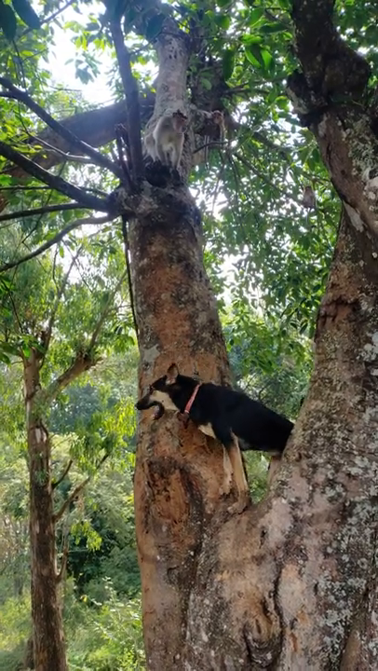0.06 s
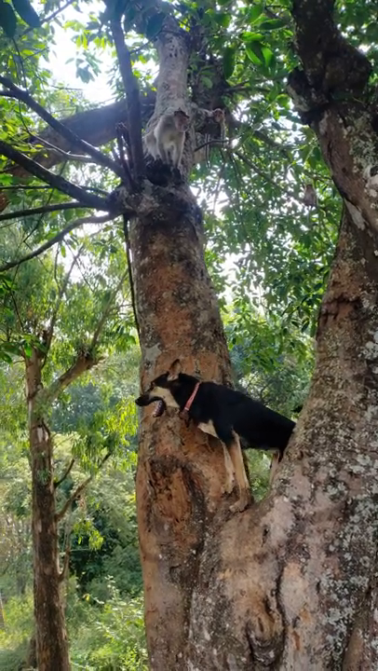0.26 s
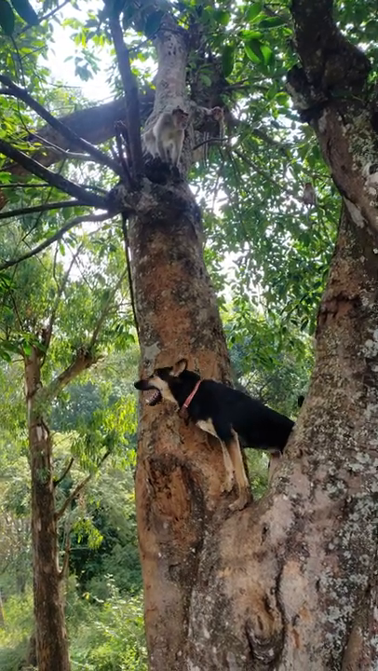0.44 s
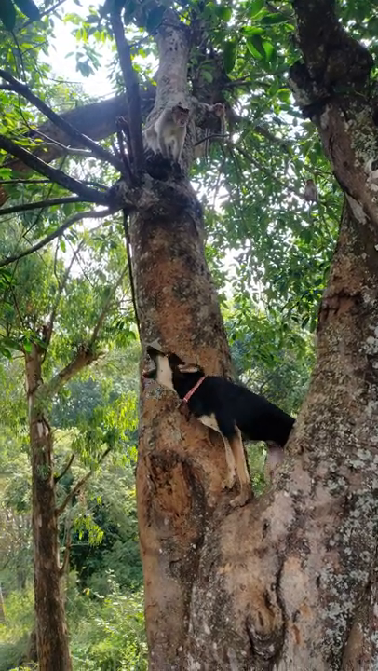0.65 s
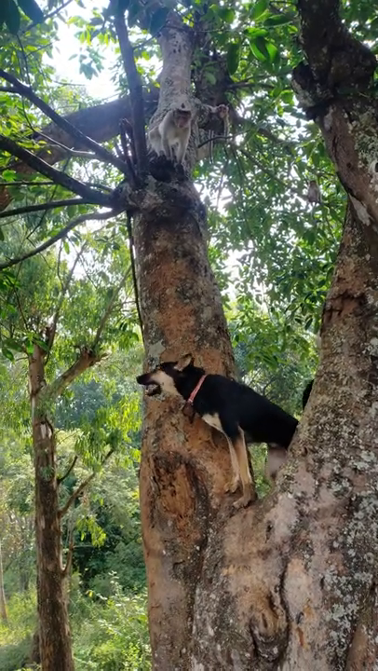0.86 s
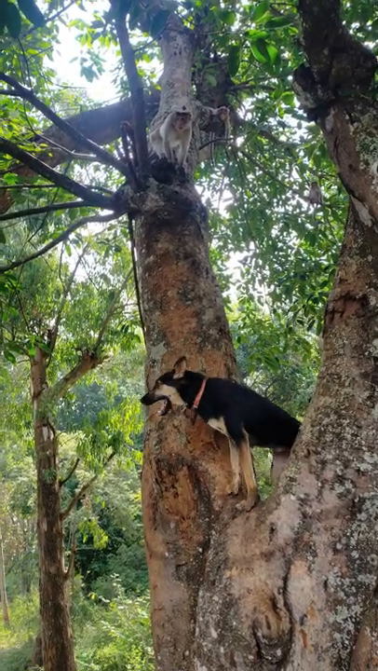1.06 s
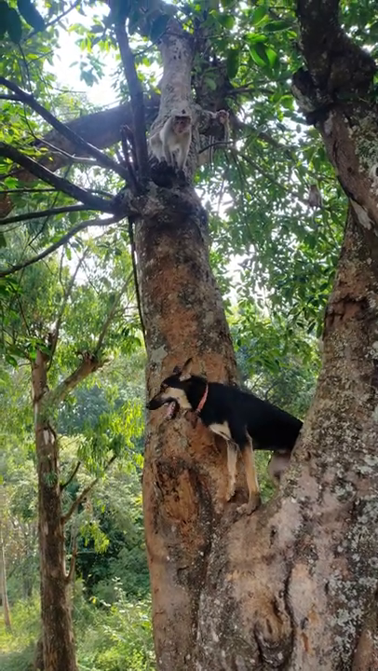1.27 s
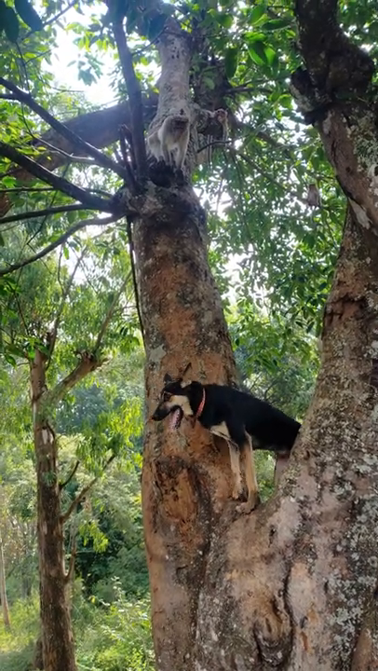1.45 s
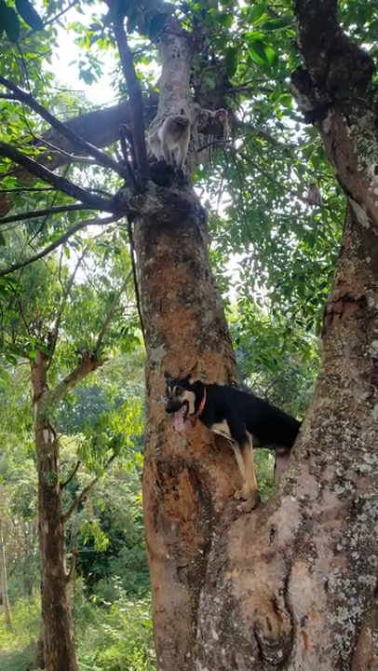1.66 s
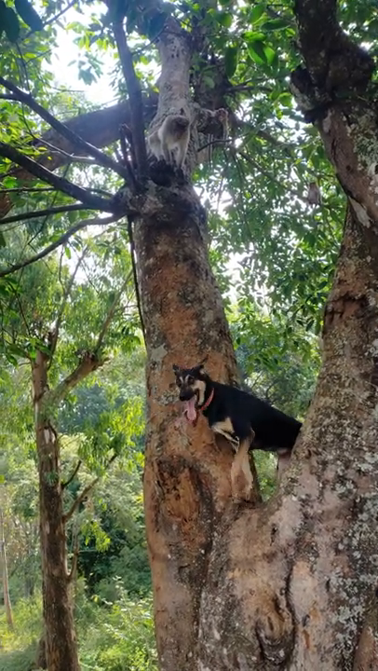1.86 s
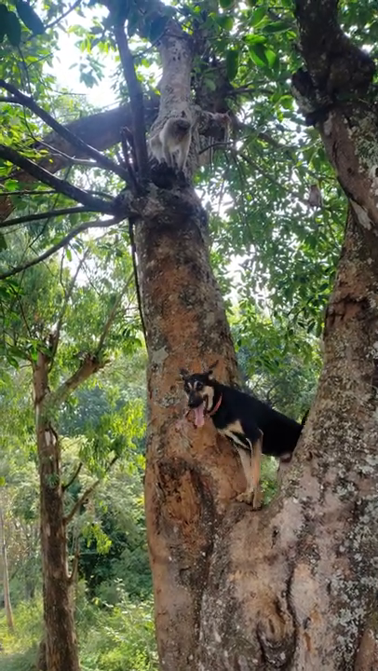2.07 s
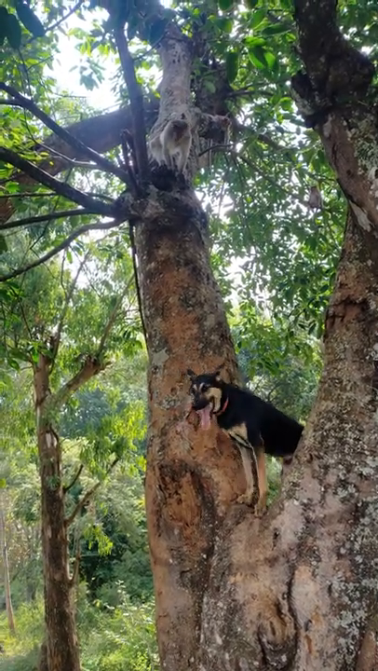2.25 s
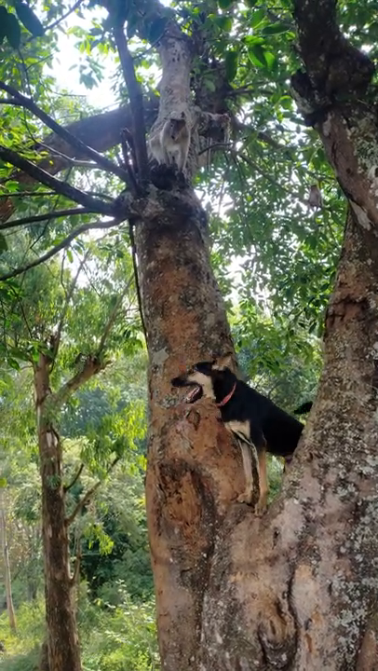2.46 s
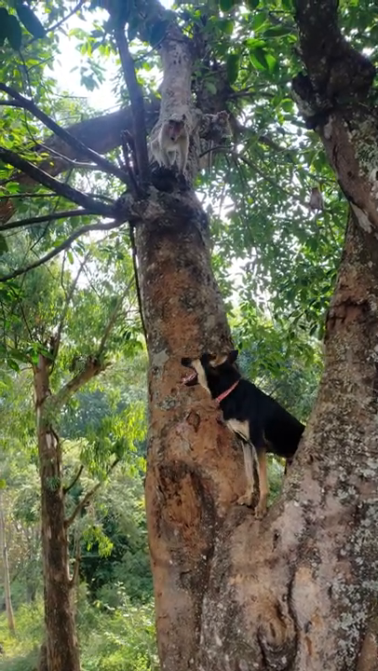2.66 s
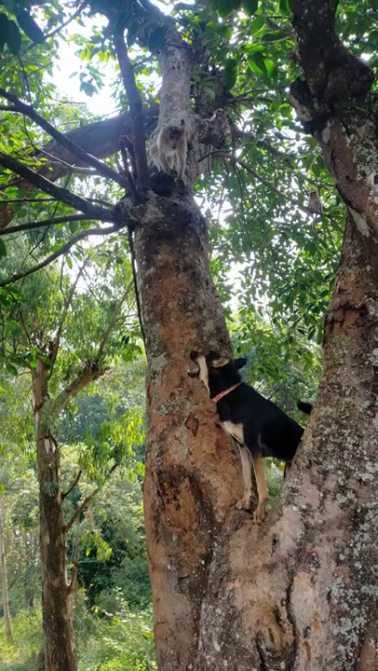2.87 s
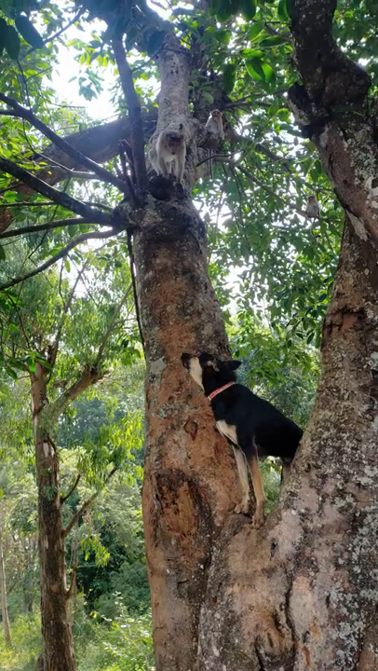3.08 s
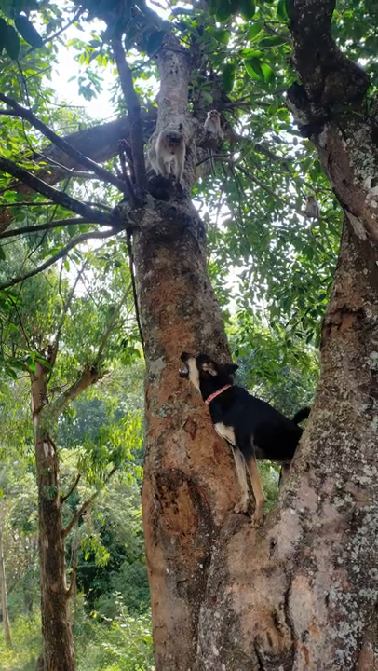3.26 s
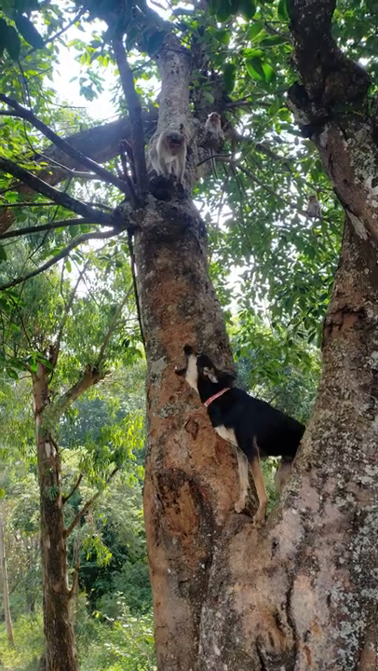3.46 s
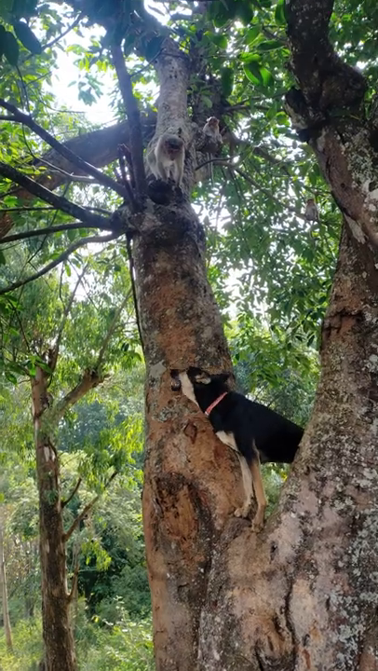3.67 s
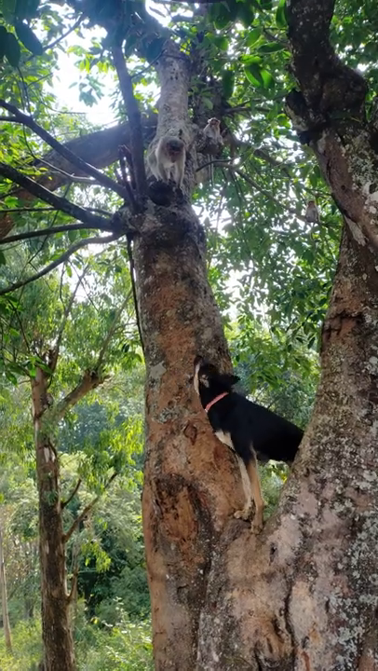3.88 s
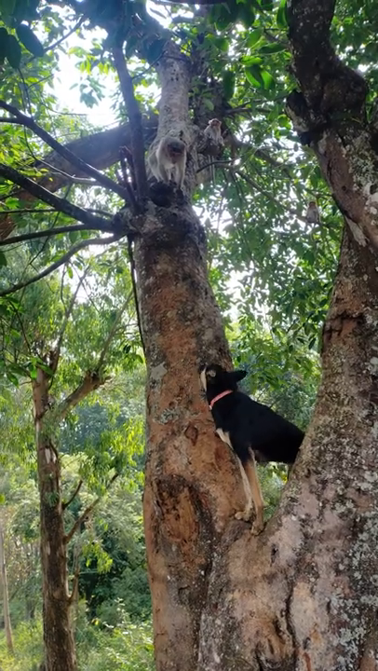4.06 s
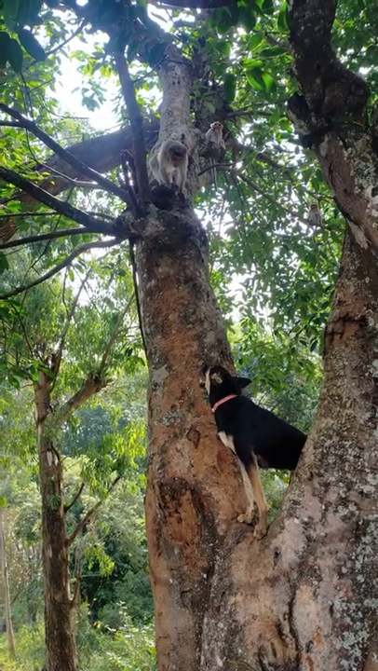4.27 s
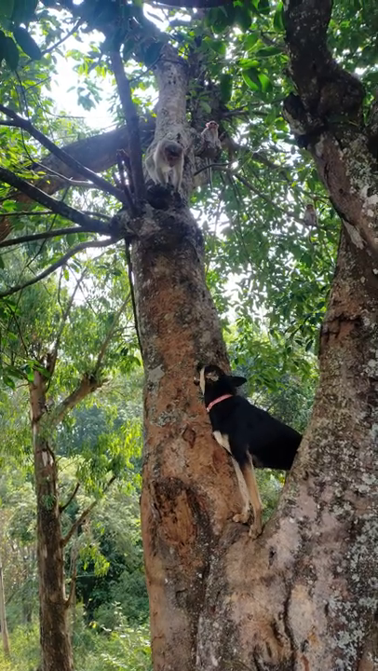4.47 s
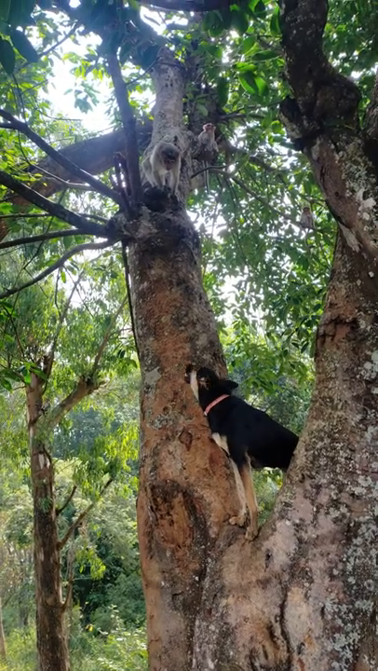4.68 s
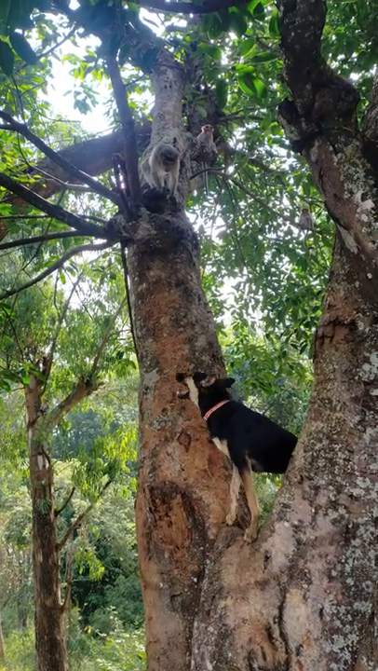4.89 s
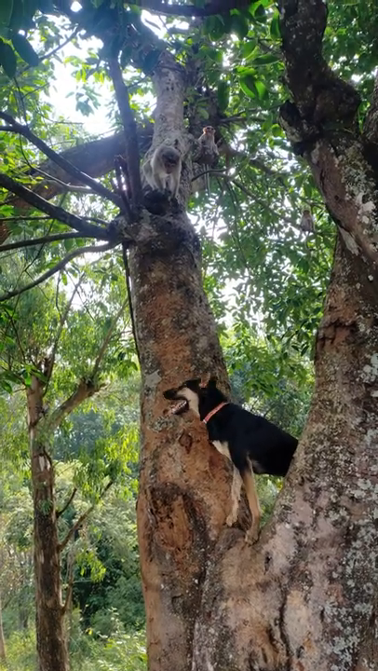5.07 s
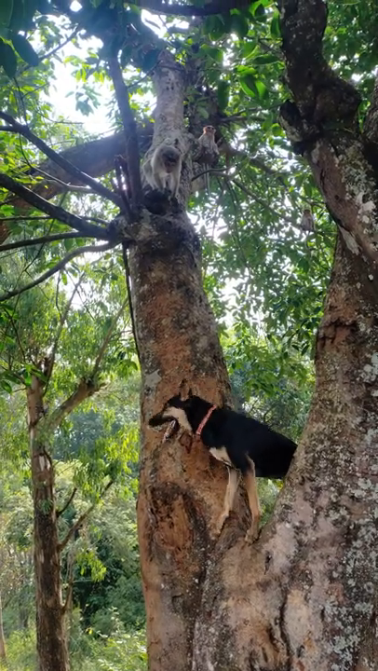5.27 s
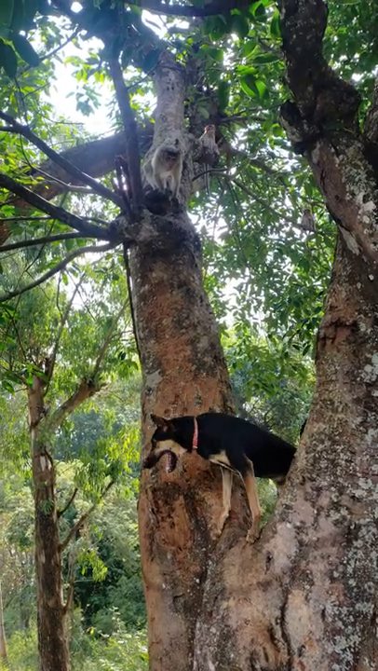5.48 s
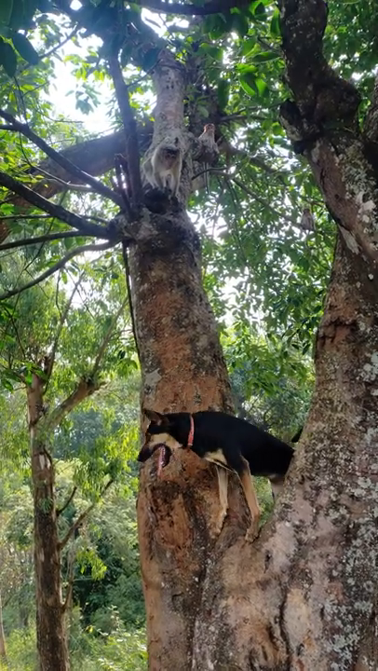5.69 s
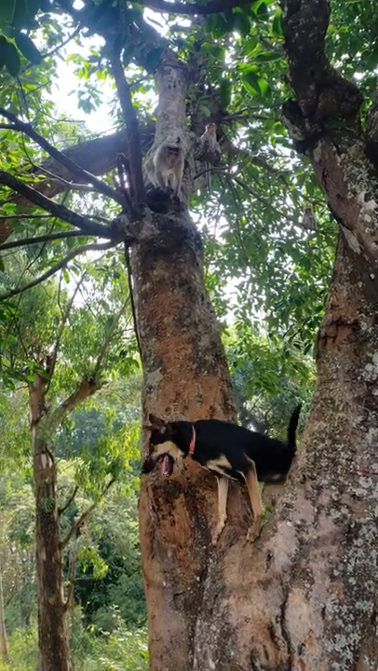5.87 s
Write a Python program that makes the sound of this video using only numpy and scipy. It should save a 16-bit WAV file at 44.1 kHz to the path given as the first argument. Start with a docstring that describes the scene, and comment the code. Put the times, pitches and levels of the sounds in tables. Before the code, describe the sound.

A dog close by in a wood gives one loud, hoarse bark. In the pause its claws tick on a tree trunk and an animal calls faintly far off. Then the dog snarls with a rattle and barks four times in a quick run, each bark starting from a low grunt and echoing off the trees. Faint insects, leaves and distant birds continue behind, while light wind rumbles on the microphone.

```python
"""Dog barking from a tree

In a wood, a dog close by in the fork of a tree barks five times, with a rattling snarl before the
second. Each bark grows out of a low grunt and a rasp, breaks upward into a clear arch and falls back
hoarse; the trees echo it. Claws tick on the trunk, insects drone among the leaves, birds and an animal
call far off, and light wind nudges the microphone, whose gain ducks under each bark."""
import sys
import numpy as np
from scipy import signal
from scipy.fft import rfft, irfft, next_fast_len
from scipy.io import wavfile
from scipy.ndimage import uniform_filter1d, minimum_filter1d

SR = 44100
rng = np.random.default_rng(int(sys.argv[2]) if len(sys.argv) > 2 else 0)


def master_out(mix):
    """Clip the mix to full scale and print it as 16-bit PCM to the path in sys.argv[1]."""
    frames = np.transpose(np.atleast_2d(mix))
    ceiling = np.clip(frames, -1, 1)
    pcm = np.round(ceiling * 32767).astype(np.int16)
    wavfile.write(sys.argv[1], SR, pcm)


N = 261513
TIME = np.arange(N) / SR


def gain_of(db):
    """Decibels to amplitude."""
    return 10 ** (np.asarray(db) / 20)


def unit_rms(x):
    """Scales to rms 1."""
    return x / np.sqrt(np.mean(x ** 2) + 1e-20)


def curve_at(points, hz):
    """Reads (frequency, value) points on a log-frequency axis."""
    f, value = np.transpose(points)
    return np.interp(np.log(hz + 1), np.log(f), value)


def add(mix, s, sound):
    """Mixes a sound in at time s."""
    part = mix[max(round(s * SR), 0):][:len(sound)]
    part += sound[:len(part)]


def noise(size=N):
    """White noise, rms 1."""
    return rng.standard_normal(N)[:size]


def shaped(x, response):
    """Filters x by a function of frequency, to rms 1."""
    size = next_fast_len(len(x) + 2048)
    return unit_rms(irfft(rfft(x, size) * response(np.fft.rfftfreq(size, 1 / SR)), size)[:len(x)])


def coloured(x, points):
    """Filters x by (f/Hz, level/dB) points, to rms 1."""
    return shaped(x, lambda f: gain_of(curve_at(points, f)))


def wander(size, rate_hz):
    """Smooth random drift, rms 1."""
    return shaped(noise(size), lambda f: 1 / (1 + (f / rate_hz) ** 4))


def step(t, width):
    """A soft step from 0 to 1 at t = 0."""
    return .5 + .5 * np.tanh(t / width / 2)


def wind(calm_db=-57.5):
    """Light gusts rumble on the microphone."""
    gusts = [(0.043, 0.16, -44.5), (0.383, .05, -52), (0.566, 0.063, -45.5), (1.27, 0.037, -45.5),
             (1.494, 0.13, -49), (4.36, 0.23, -47.5), (5.081, 0.26, -44.5), (5.82, 0.23, -45.5)]  # t/s, half length/s, level/dB
    rumble = [(8, 6), (25, 4.5), (45, 0.5), (80, -6.5), (130, -19), (250, -37.5), (600, -54.5)]  # spectrum: f/Hz, relative level/dB
    swells = sum(gain_of(db) * np.exp(-((TIME - s) / half) ** 2) for s, half, db in gusts)
    return coloured(noise(), rumble) * (gain_of(calm_db) + swells) * gain_of(2 * wander(N, 14))


def leaves(level_db=-59):
    """A faint, swaying wash of leaves."""
    rustle = [(60, -1), (250, -4.5), (450, -4), (800, -7.5), (1400, -3), (2500, -3.5), (4200, -11),
              (9500, -21), (12000, -11.5), (15500, -8)]  # spectrum: f/Hz, relative level/dB
    sway_db = 1.2 * wander(N, 5)
    return coloured(noise(), rustle) * gain_of(level_db + sway_db)


def insects(trim_db=-0.83, throb_db=0.95):
    """An insect chorus throbs in four high bands."""
    bands = [(5500, 660, -1.5), (6510, 240, -0.5), (7253, 440, 3), (7970, 560, -3)]  # drone peaks: f/Hz, width/Hz, relative level/dB
    chorus = [(0.0, -59), (2.53, -62), (2.77, -60.5), (4.99, -58.5), (5.53, -60.5), (5.93, -59.5)]  # slow rise and fall: t/s, relative level/dB
    drone = shaped(noise(), lambda f: sum(gain_of(db) / (1 + (2 * (f - hz) / width) ** 2)
                                          for hz, width, db in bands))
    return drone * gain_of(trim_db + np.interp(TIME, *np.transpose(chorus)) + throb_db * wander(N, 8.2))


def wood(x, near_t60=0.044, echo_s=0.1151, echo_width_s=0.013, far_t60=2.55):
    """Near trunks scatter at once, a stand of trees answers a moment later, the far wood lingers."""
    colour = [(200, 1.5), (500, -5.5), (800, 1.5), (1400, 3), (2400, 1), (4000, 2.5), (9000, 4),
              (15000, -0.5)]  # tone of the echo: f/Hz, gain/dB
    decay = [(200, 0.73), (700, 0.69), (1400, 0.75), (2500, 0.84), (5000, 1), (15000, 0.15)]  # ring at middle distance: f/Hz, t60/s
    size = 2 * SR
    t = TIME[:size]
    near, middle, stand, far = rng.standard_normal((4, size)) * (rng.random((4, size)) < .1)
    hz, frame_s, spectra = signal.stft(middle, SR, nperseg=256)
    spectra *= gain_of(-60 * frame_s / curve_at(decay, hz)[:, None])
    middle = signal.istft(spectra, SR, nperseg=256)[1][:size]
    # relative level/dB, reflections
    parts = [(-12, near * (t > .002) * gain_of(-60 * t / near_t60)),
             (-20, middle * np.minimum(t / 0.034, 1)),
             (-20.7, stand * np.exp(-((t - echo_s) / echo_width_s) ** 2)),
             (-33.5, far * np.minimum(t / 0.25, 1) * gain_of(-60 * t / far_t60))]
    taps = sum(gain_of(db) * unit_rms(part) for db, part in parts) / np.sqrt(size)
    taps = irfft(rfft(taps) * gain_of(curve_at(colour, np.fft.rfftfreq(size, 1 / SR))), size)
    return x + signal.fftconvolve(x, taps)[:N]


def claws(trim_db=-4.5, crumble_db=-23, crumble_t60=0.24):
    """A claw ticks on the trunk, then a little tree bark crumbles."""
    ticks = [(0.071, -41.5, 0.054), (1.3323, -27, 0.0095), (1.54, -33, 0.01), (1.5553, -31, 0.015),
             (1.5814, -26.5, 0.0082), (1.8902, -39.5, 0.041), (2.174, -48, 0.03), (5.8134, -40.5, 0.13),
             (5.85, -47, 0.04)]  # t/s, relative level/dB, t60/s
    colour = [(300, -10.5), (1200, -9.5), (2200, 1.5), (3600, -1.5), (5500, -2.5), (9500, -14.5),
              (14000, -7), (16000, -3)]  # tick spectrum: f/Hz, relative level/dB
    out, t = np.zeros(N), TIME[:6000]
    for s, db, t60 in ticks:
        fade = gain_of(-60 * t / t60) + gain_of(crumble_db - 60 * t / crumble_t60)
        add(out, s, gain_of(db + trim_db) * fade * coloured(rng.standard_normal(len(t)), colour))
    return out


def whistles():
    """Thin gliding whistles: distant birds, and the dog's whistle just before its first bark."""
    notes = [(0.074, 0.083, -68, 4000, 4100, 4130), (0.576, 0.08, -53.5, 3400, 3060, 3040),
             (2.2, 0.25, -73, 2890, 2790, 2730), (4.414, 0.18, -65.5, 2920, 3265, 3360),
             (5.48, 0.034, -67, 2950, 2720, 2440)]  # t/s, length/s, level/dB, start f/Hz, middle f/Hz, end f/Hz
    out = np.zeros(N)
    for s, length, db, *pitches in notes:
        progress = np.linspace(0, 1, round(length * SR))
        glide_hz = np.polyval(np.polyfit([0, .5, 1], pitches, 2), progress)
        phase = 2 * np.pi * np.cumsum(glide_hz * (1 + .018 * wander(len(progress), 220))) / SR
        add(out, s, gain_of(db) * unit_rms(np.sin(np.pi * progress) * np.sin(phase)))
    return out


def grunts_and_thud(half_pitch_db=-6, rattle_db=-2, slack=0.34, range_db=20):
    """Low grunts of the dog, rattling as its folds tighten, and one short, soft thud at 4.445 s."""
    events = [(.648, -37, .125, .03, 201, 800), (2.68, -51, .18, .15, 195, -51),
              (2.83, -48, .13, 0.22, 151.2, -400), (2.995, -35.5, 0.061, 0.034, 204.2, 792),
              (3.46, -37.5, 0.039, 0.04, 168, 851), (3.63, -50, .05, 0.081, 179, -1400),
              (3.93, -39, 0.11, 0.085, 202.5, 500), (4.114, -44, .055, 0.047, 214, -1600),
              (4.445, -46, .03, 0.017, 146, 197), (4.625, -37, .125, .035, 197, 645),
              (4.835, -45.5, .06, 0.051, 143, -1250)]  # loudest t/s, level/dB, swell/s, fade/s, f/Hz, glide/(Hz/s)
    rattle_colour = [(50, -19), (120, 8.5), (320, -1.5), (500, -4), (1000, -28)]  # f/Hz, level/dB
    out = np.zeros(N)
    for s, db, swell, fade, hz, glide in events:
        t = np.arange(-swell, fade, 1 / SR)
        size = len(t)
        strain = 1 if glide > 0 else slack
        level = gain_of(db - range_db * np.maximum(-t / swell, t / fade))
        level *= signal.windows.tukey(size, .15)
        phase = 2 * np.pi * np.cumsum((hz + glide * t) * (1 + .06 * strain * wander(size, 80))) / SR
        skips = strain * gain_of(half_pitch_db) * np.sin(phase / 2)
        tone = unit_rms(np.sin(phase) + skips + 0.36 * np.sin(2 * phase))
        rattle = coloured((1 + np.cos(phase / 2)) * noise(size), rattle_colour)
        add(out, s - swell, level * unit_rms(tone + strain * gain_of(rattle_db) * rattle))
    return out


def throat(x, formants, low_hz, tilt_db_per_octave=0, top_hz=2700, valley_db=-23):
    """The throat's resonances ring on after each pulse, between steep band edges."""
    size = next_fast_len(len(x) + 4096)
    f = abs(np.fft.fftfreq(size, 1 / SR)) + 1
    peaks = sum(gain_of(db) / (1 + (2 * (f - hz) / width) ** 2) ** 0.92 for hz, width, db in formants)
    edges = np.sqrt((1 + (low_hz / f) ** 14) * (1 + (f / top_hz) ** 24))
    tilt = gain_of(tilt_db_per_octave * np.log2(f / low_hz))
    log_gain = np.log((peaks + gain_of(valley_db)) * tilt / edges + 1e-4)
    minimum_phase = np.exp(np.conj(signal.hilbert(log_gain)))
    return unit_rms(np.fft.ifft(np.fft.fft(x, size) * minimum_phase).real[:len(x)])


def rasps(rattle_hz=110):
    """Short puffs rattle through the half-shut throat as it tightens for a bark."""
    puffs = [(0.534, -46, 0.091), (0.573, -32.5, 0.01), (0.595, -40.5, 0.082), (2.9, -51.5, 0.065),
             (2.942, -44, 0.1), (2.965, -34, 0.029), (3.443, -33, 0.007), (3.888, -39, 0.029),
             (4.527, -48, 0.085), (4.562, -43, 0.033), (4.591, -28, 0.018)]  # t/s, level/dB, fade/s
    formants = [(753, 166, 9.5), (1340, 240, -1.0), (2080, 720, -3.5)]  # f/Hz, width/Hz, level/dB
    out = np.zeros(N)
    for s, db, fade in puffs:
        t = TIME[:round(2 * fade * SR)]
        rattle = 0.3 + np.exp(-(t * rattle_hz % 1) / 0.077)
        puff = throat(rattle * noise(len(t)), formants, low_hz=360)
        add(out, s, gain_of(db) * puff * np.minimum(t / 0.0028, 1) * np.exp(-(t / fade) ** 4))
    return out


def chest_push(start, attack, length, release, effort_db, low_hz, break_s, top_s, top_hz,
               rough_start, rough_top, rough_end=0.86, sag_db_per_s=17.5, pitch_per_db=.0055):
    """One push of the chest: pitch follows effort, breaks upward into an arch, and falls back hoarse."""
    lead_s, trail_s = .03, 0.044  # the folds stir before a bark and run on after it
    t = np.arange(-lead_s, length + trail_s, 1 / SR)
    push_db = 20 * np.log10(step(t, attack) * step(length - t, release) + .01)
    arch_width_s = np.where(t < top_s, .054, .039)  # climbs slowly, drops faster
    arch = step(t - break_s, 0.0031) * np.exp(-((t - top_s) / arch_width_s) ** 2)
    hz = (low_hz + (top_hz - low_hz) * arch) * np.exp(pitch_per_db * push_db)
    dip_db = 2 * np.exp(-((t - break_s) / 0.044 - 1) ** 2)  # the level stumbles after the break
    rough = np.interp(t, [break_s, top_s, length], [rough_start, rough_top, rough_end])
    return start - lead_s, effort_db + push_db - sag_db_per_s * t - dip_db, hz, rough, arch


def teeth_hiss(puffs, cycles, effort_db, level_db):
    """Air buzzes past the teeth, most when the jaw is widest, and fades later than the voice."""
    colour = [(1500, -19), (3000, 4), (4300, -6.5), (5800, -4.5), (7000, -8), (9000, -17.5), (11500, -13.5),
              (14000, -8), (16000, -3.5)]  # spectrum: f/Hz, relative level/dB
    progress = np.linspace(0, 1, len(puffs))
    jaw_db = 9 * (np.sin(np.pi * progress) - 1)
    flutter_db = 2 * wander(len(puffs), 45)
    linger_db = 0.73 * (effort_db.max() - effort_db) * progress
    buzz = sum(np.cos(2 * np.pi * (k * cycles + rng.random())) for k in range(8, 19))
    air = coloured(unit_rms(puffs) + gain_of(-12) * unit_rms(buzz), colour)
    return air * gain_of(level_db + jaw_db + flutter_db + linger_db)


def bark(push, formants, voicing):
    """Vocal folds beat, now cleanly, now unevenly with puffs of air, through the throat."""
    hiss_db, low_hz, second_low_db, second_high_db, third_db, split_db, bite_db = voicing
    s, effort_db, hz, rough, arch = chest_push(*push)
    size = len(hz)
    t = TIME[:size]
    rough = np.clip(rough * (1 + 0.17 * wander(size, 35)), .01, 1)
    jitter = (0.0057 + .025 * rough) * wander(size, 200)
    waver = 0.011 * rough * wander(size, 40)
    cycles = np.cumsum(hz * (1 + jitter + waver)) / SR
    # under strain, strong and weak beats alternate: partials appear halfway between the whole ones
    split = gain_of(split_db) * np.sqrt(rough / rough.mean())
    partials = {k: np.cos(2 * np.pi * (k * cycles + rng.random())) for k in np.arange(2, 22) / 2}
    folds = sum((split if k % 1 else 1) * partial * gain_of(3 * wander(size, 35))
                for k, partial in partials.items())
    throat_air, teeth_air = (0.27 + np.exp(-(cycles % 1) / 0.64)) * [noise(size), noise(size)]
    air_share = .1 + .65 * rough
    voice = (1 - air_share) * throat(folds, formants, low_hz, tilt_db_per_octave=-2)
    voice += air_share * throat(throat_air, formants, low_hz, tilt_db_per_octave=2)
    # the second partial carries the "wow"; the third flares as it sweeps through the second resonance
    second, third = (np.cos(np.angle(signal.hilbert(throat(partials[k], formants, low_hz))))
                     for k in (2, 3))
    second *= gain_of(second_low_db + (second_high_db - second_low_db) * arch)
    second /= np.sqrt(1 + (450 / (2 * hz)) ** 14)  # it dies below the throat's range
    third *= gain_of(third_db) / np.sqrt(1 + ((3 * hz - formants[1][0]) / 130) ** 2)
    voice += 2 * (1 - rough) * (second + third)
    voice /= np.sqrt(uniform_filter1d(voice ** 2, size=600) + 1e-6)  # loudness follows effort alone
    # a high resonance slides down and dies as the lips part
    bite_phase = 2 * np.pi * np.cumsum(3100 - 7000 * t) / SR
    bite = wander(size, 180) * np.sqrt(2) * np.cos(bite_phase) * np.exp(-(t / 0.12) ** 4)
    mouth = voice + gain_of(bite_db) * bite + teeth_hiss(teeth_air, cycles, effort_db, hiss_db)
    return s, gain_of(effort_db) * mouth * signal.windows.tukey(size, .08)


def far_call(length_s=0.947, start_hz=885, rest_hz=830, sink_s=0.54):
    """A far animal holds one note, which sinks in pitch while its second partial swells."""
    t = TIME[:round(length_s * SR)]
    hz = rest_hz + (start_hz - rest_hz) * np.exp(-t / sink_s)
    phase = 2 * np.pi * np.cumsum(hz * (1 + 0.01 * wander(len(t), 50))) / SR
    call = gain_of(-68) * np.sin(phase) + gain_of(-69 + 4.5 * t) * np.sin(2 * phase)
    return np.sqrt(2) * call * gain_of(3.8 * wander(len(t), 28)) * signal.windows.tukey(len(t), .1)


def snarl(length_s=0.41, level_db=-39, swell_db=17.5, slap_hz=205, flap_hz=29.8, merge_s=.19):
    """Wet slaps of the throat come in bunches, which merge as the snarl swells."""
    muzzle = [(120, -7.5), (300, -8), (680, -0.5), (890, 2.5), (1150, -7), (1650, -4), (2900, -27),
              (3500, -7.5), (4050, -26), (4550, -20), (7000, -23.5), (9500, -39), (13500, -15.5),
              (16000, -15)]  # spectrum of the snarling mouth: f/Hz, relative level/dB
    t = TIME[:round(length_s * SR)]
    size = len(t)
    swell = gain_of(level_db - swell_db * (2 * t / length_s - 1) ** 2)
    cycles = np.cumsum(slap_hz * (1 + 0.17 * wander(size, 90))) / SR
    pulses = np.diff(np.floor(cycles), prepend=0) * gain_of(2 * noise(size))
    splash = rng.standard_normal(400) * np.exp(-TIME[:400] / 0.0026)
    slaps = signal.fftconvolve(pulses, splash)[:size]
    air = np.exp(-(cycles % 1) / 0.35) * noise(size)
    flap = (.5 + .5 * np.cos(2 * np.pi * (flap_hz * t + 0.27))) ** 2
    depth = 0.32 + 0.52 * np.exp(-(t / merge_s) ** 4)
    bunches = unit_rms(1 - depth * (1 - flap))
    return swell * bunches * coloured(unit_rms(slaps) + gain_of(-1) * unit_rms(air), muzzle)


def scene(earlier_s=0.97, earlier_db=-2):
    """The dog and its neighbours at one microphone; an earlier bark is still echoing at the start."""
    # chest push for each bark: t/s, attack/s, length/s, release/s, effort/dB, low f/Hz,
    # break after/s, top after/s, top f/Hz, roughness at the break and at the top (0-1)
    pushes = [(0.652, 0.0051, .120, .010, -9, 300, 0.031, 0.077, 489.1, 0.36, 0.15),
              (2.998, 0.00654, 0.12, .012, -9, 339.4, 0.023, 0.067, 495, 0.46, 0.07),
              (3.465, 0.0059, .119, 0.0148, -8, 301.6, .013, .061, 439.6, 0.36, 0.46),
              (3.927, 0.00344, 0.13, 0.0191, -9.5, 295.5, 0.04, .08, 448.5, 0.39, 0.13),
              (4.617, 0.00298, .140, .013, -9.5, 319.4, .037, 0.079, 484, 0.46, 0.25)]
    # four resonances for each bark, as head and jaw are held: f/Hz, width/Hz, relative level/dB
    throats = [
        [(701, 243, 2), (1263, 250, 1), (1887, 230, -5), (2464, 180, -10)],
        [(643, 154, 10.5), (1283, 240, 3), (1800, 860, -1), (2320, 1100, -9.5)],
        [(650, 340, -2), (1276, 130, 1.5), (1792, 210, -2), (2270, 240, -7.5)],
        [(686, 106, 2), (1300, 610, -5), (1800, 340, -8), (2270, 250, -6)],
        [(735, 216, 1), (1314, 226, -2), (1745, 440, -9), (2370, 440, -8.5)],
    ]
    # balance of each bark: hiss/dB, low edge f/Hz, second partial in the low and the high register/dB,
    # third partial/dB, half-pitch partials/dB, bright bite/dB
    voicings = [(-25.5, 543, -14.5, -34.5, -16.5, -13, -25), (-21.5, 512, -19, -25, -14.5, -14, -26),
                (-23, 540, -5.5, -34, -9, -2, -17), (-23.5, 645, -5.5, -12, -9.5, 6, -16.5),
                (-24, 627, -7, -19, -13, -3.5, -18.5)]
    direct = grunts_and_thud() + rasps()
    for push, formants, voicing in zip(pushes, throats, voicings):
        add(direct, *bark(push, formants, voicing))
    add(direct, 2.47, snarl())
    direct += claws() + whistles()
    add(direct, 1.62, far_call())
    mix = wood(direct) + wind() + leaves() + insects()
    earlier = np.zeros(N)
    add(earlier, *bark(pushes[0], throats[0], voicings[0]))
    add(mix, 0, gain_of(earlier_db) * wood(earlier)[round(earlier_s * SR):])
    return mix[None]


def record(dry, threshold_db=-26, squeeze=0.37, recover_db_per_s=95, ceiling=0.62, edge_hz=15850):
    """Gain control ducks under each bark and lets the echo swell back; then a limiter and a low-pass."""
    power_db = 10 * np.log10(abs(uniform_filter1d(dry[0] ** 2, size=800)) + 1e-12)
    recovery_db = recover_db_per_s * TIME
    held_db = np.maximum.accumulate(power_db + recovery_db) - recovery_db
    over_db = np.maximum(held_db - threshold_db, 0)
    ducked = dry / gain_of(squeeze * uniform_filter1d(over_db, size=200))
    allowed = np.minimum(ceiling / (abs(ducked) + 1e-9), 1)
    limited = ducked * uniform_filter1d(minimum_filter1d(allowed, size=300), size=300)
    low_pass = signal.firwin(511, edge_hz, window=("kaiser", 9), fs=SR)
    return signal.oaconvolve(limited, low_pass[None], "same")


dry = scene()
out = record(dry)
master_out(out)
```